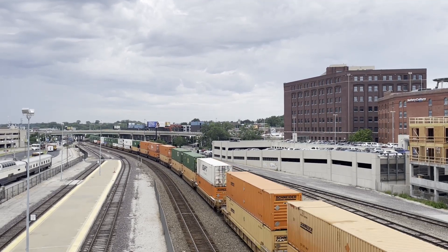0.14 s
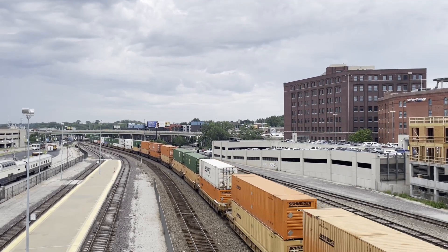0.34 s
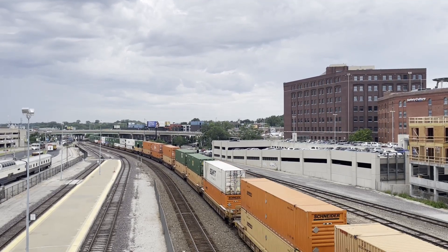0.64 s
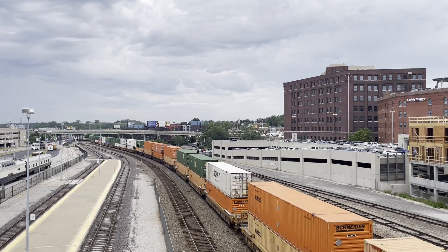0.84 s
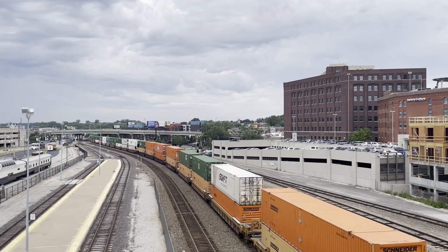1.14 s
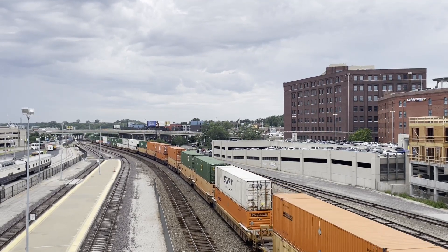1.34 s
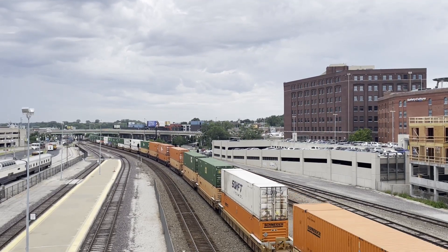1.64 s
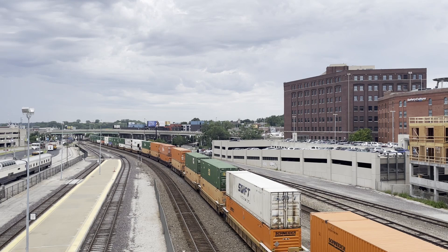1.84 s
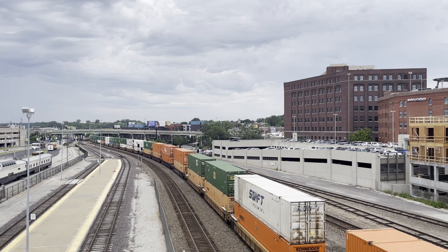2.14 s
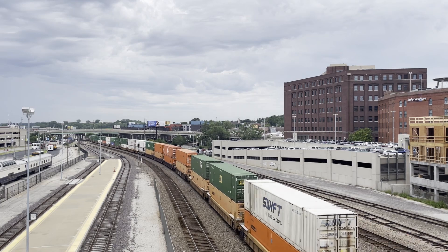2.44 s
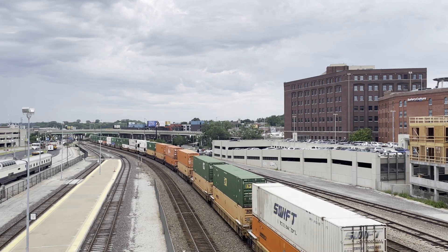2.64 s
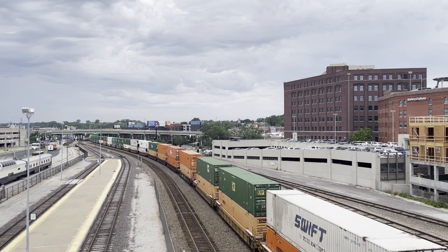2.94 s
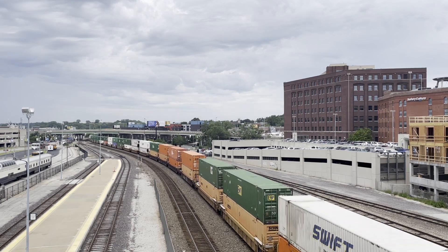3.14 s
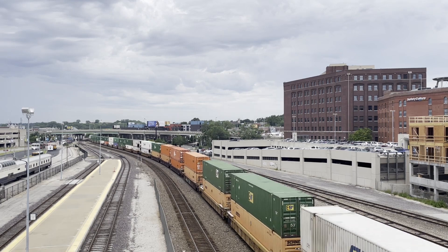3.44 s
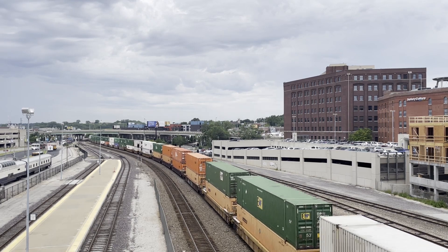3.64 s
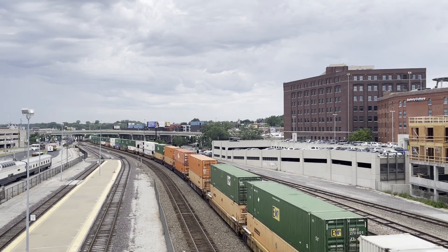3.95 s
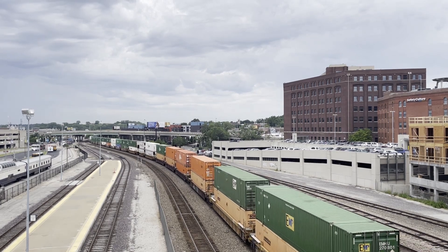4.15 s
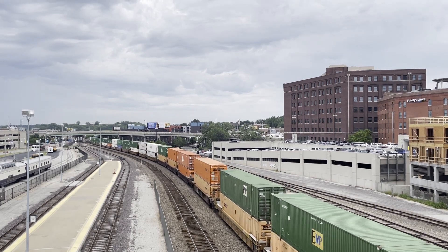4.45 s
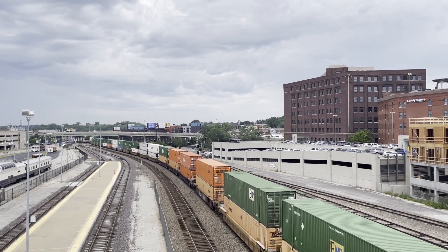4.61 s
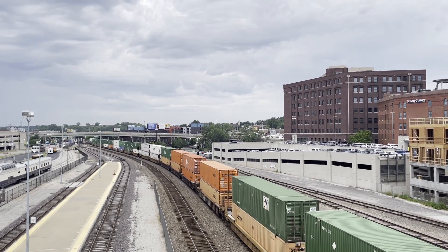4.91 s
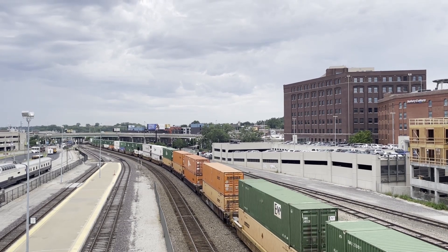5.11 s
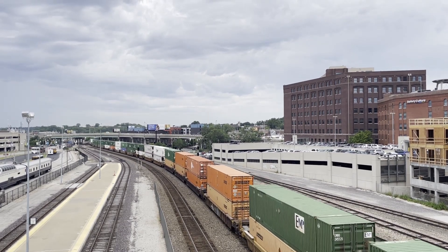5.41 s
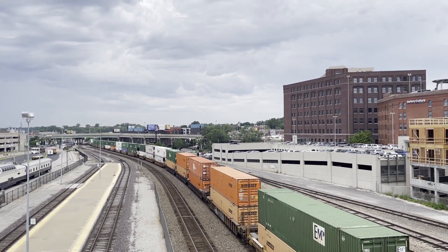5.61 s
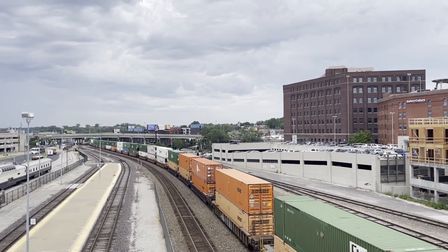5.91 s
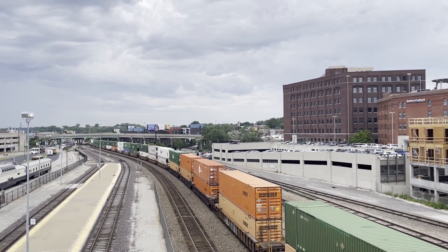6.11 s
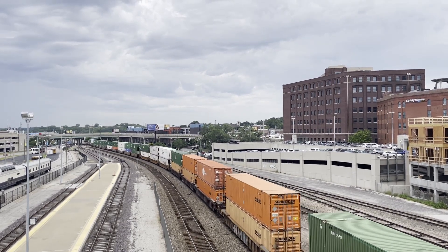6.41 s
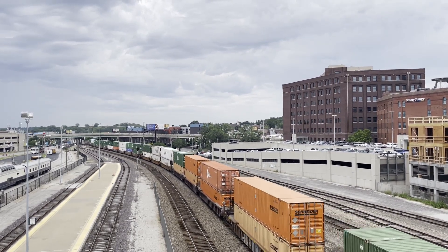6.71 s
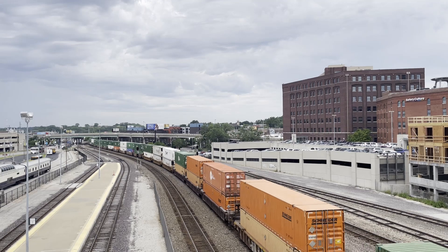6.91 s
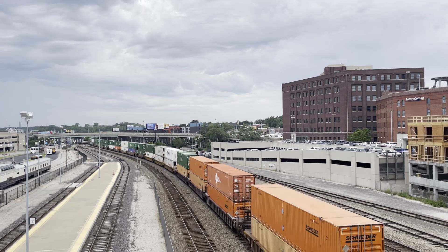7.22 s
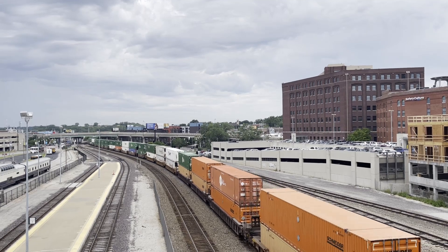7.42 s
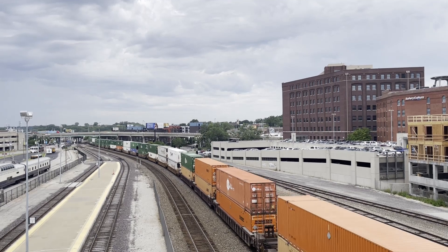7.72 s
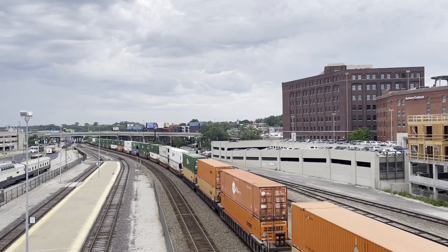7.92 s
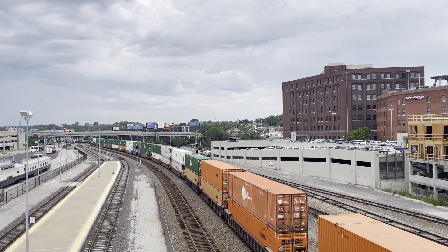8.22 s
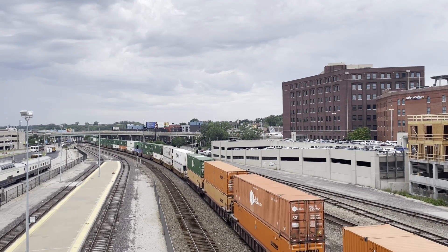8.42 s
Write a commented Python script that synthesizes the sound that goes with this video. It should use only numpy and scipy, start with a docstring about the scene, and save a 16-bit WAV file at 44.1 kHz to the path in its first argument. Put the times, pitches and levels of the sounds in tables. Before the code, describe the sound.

Steady wheel roar and low boxy rumble from passing container wagons, close and wide in stereo outdoors. Flange rubbing and faint high squeals come and go. Knocks bunch up around the middle, the deep drumming briefly drops, small chains clink, then rougher, louder rolling with dense thuds and short chirping squeals carries on to the end. Soft low wind puffs strike the phone microphone, easing midway and returning.

```python
"""Heavy wheels roar, scrape and squeal, hollow steel drums and clunks, and wind puffs at the microphone:
a double-stack container train rolls round a curve below a bridge, heard from a phone in a light wind.
Filtered noise makes the roar, drumming, rubbing and wind; gliding sine tones make most of the squeals.
Clunks are swelling tones and noise, clinks are short noise bursts, and the deep boom of empty boxes is
ringing noise. Squeals, clunks and clinks also return from the yard as a diffuse echo."""
import sys
import numpy as np
from scipy import signal
from scipy.fft import rfft, irfft
from scipy.io import wavfile
from scipy.ndimage import uniform_filter1d, map_coordinates

SR = 44100
rng = np.random.default_rng(int(sys.argv[2]) if len(sys.argv) > 2 else 0)


def dump(signal):
    """Clip the signal to [-1, 1] and save it as 16-bit WAV at the path in sys.argv[1]."""
    limited = np.clip(np.atleast_2d(signal).T, -1, 1)
    pcm = np.round(limited * 32767).astype(np.int16)
    wavfile.write(sys.argv[1], SR, pcm)


N = 377496
TIME = np.arange(N) / SR  # seconds
FREQS = np.maximum(np.arange(N // 2 + 1) * SR / N, 1)  # Hz, kept above zero for the logarithm

# How strongly the wind puffs at the phone. Each row: time in seconds, level in dB before the puffs.
WIND_STRENGTH = [(0.0, -18.5), (0.9, -22.5), (3.1, -24), (3.75, -19), (4.22, -23.5), (4.34, -27.5),
                 (5.1, -33), (5.8, -33.5), (6.4, -29), (6.75, -25.5), (7.0, -23.5), (8.56, -20)]
# Colour of the wind. Each row: frequency in Hz, relative level in dB.
WIND_COLOUR = [(12, -52), (25, -32), (40, -10.5), (58, -1), (80, -2), (110, -4.5), (145, -13), (250, -18.5),
               (600, -87)]

# Loose chains and fittings clinking. Each row: start in seconds, strength in dB before colouring.
CLINKS = [(3.122, -35), (4.539, -20), (4.786, -23), (4.883, -18), (5.241, -21), (5.913, -20), (6.113, -21),
          (6.434, -21), (6.538, -25), (7.099, -32)]
# Colour of the clinks. Each row: frequency in Hz, gain in dB.
CLINK_COLOUR = [(400, 19), (850, 15.5), (1700, 5.5), (3000, -11), (7000, -28), (14000, -55)]

# Empty containers booming. Each row: start in seconds, length in seconds, pitch in Hz, level in dB.
BOOMS = [(2.894, 0.96, 346.5, -23), (3.9, 0.45, 326, -24.5), (4.692, 0.21, 331, -26.5),
         (4.855, .42, 305, -23.5), (5.62, 0.46, 280, -25.5)]

# Rails ringing under the wheels. Each row: pitch in Hz, width of one filter pass in Hz, level in dB.
RAIL_MODES = [(1530, 150, -45), (2050, 220, -48)]
RAIL_DRIFT = 0.024  # typical share by which the ringing wanders as the wheels move along

# Treads slipping sideways on the rail head. Each row: start in seconds, length in seconds,
# centre frequency in Hz, level in dB.
SCRAPES = [(-0.1, 0.97, 1350, -34.5), (-0.1, .8, 2090, -37.5), (1.7, 0.39, 2010, -40),
           (4.87, .14, 1350, -36), (4.85, 0.77, 1740, -44), (5.4, .35, 1500, -40), (6.167, 0.14, 1040, -33),
           (7.48, 0.22, 1600, -37), (7.896, 0.079, 1410, -31.5)]

# Wheels squealing. Each row: start in seconds, length in seconds, pitch in Hz,
# level in dB before stutter and a common gain, rasp as pitch scatter in Hz, glide in Hz.
SQUEALS = [(0.448, 0.5, 3960, -51, 60, 1), (0.799, 0.6, 7090, -44.5, 9, -15),
           (0.953, 0.68, 7060, -47, 130, -78.5), (1.68, .38, 2160, -45, 45, -20),
           (1.72, .26, 1870, -44, 40, 30), (1.936, .38, 11690, -57, 50, 0), (2.05, .85, 11750, -59, 260, 0),
           (2.565, 0.11, 2095, -33, 14, 25), (2.56, 0.36, 4990, -51.5, 55, -50),
           (3.27, .16, 1965, -39.5, 35, 0), (3.7, 3.16, 3205, -56, 20, -10),
           (4.45, 0.13, 1645, -39.5, 30, 25), (4.401, 4.5, 4690, -55.5, 90, -59.5),
           (4.89, .12, 1850, -40, 50, 0), (5.02, .14, 2155, -42, 50, 0), (5.52, .16, 6570, -51, 30, 0),
           (5.776, 0.26, 6480, -46, 110, 1), (6.4, .14, 1925, -40, 45, 0), (6.86, 0.17, 1900, -38, 17, -8),
           (6.955, 0.06, 2295, -40.5, 50, 0), (6.95, .22, 3520, -44, 35, -15),
           (6.93, 0.16, 7060, -47, 90, 0), (7.3, 0.13, 1630, -37, 22, 40), (7.49, 0.11, 1370, -35, 22, 50),
           (7.53, 0.18, 1470, -35, 14, 70), (7.7, 0.26, 3200, -46, 15, 2),
           (7.82, 0.18, 3705, -45.5, 45, 20), (8.03, 0.1, 3730, -44.5, 50, 0)]
# Dry flanges sizzling and dying away. Each row: start in seconds, length in seconds, level in dB,
# release in seconds.
SIZZLES = [(2.0, 0.94, -50, 0.35), (2.85, 0.57, -49.5, 0.42), (4.8, .25, -54, 0.28), (5.6, .35, -51, .15),
           (6.95, 0.079, -41.5, 0.16)]
SIZZLE_ATTACK_S = 0.06
# Colour of the sizzle. Each row: frequency in Hz, relative level in dB.
SIZZLE_COLOUR = [(8000, -7), (10500, -7.0), (11700, -7.5), (12800, -15), (14300, -5.0)]

# Flanges pressed on the outer rail. Each row: start in seconds, length in seconds, level in dB,
# release in seconds.
FLANGE_RUBS = [(-0.1, 0.46, -33, 0.58), (1.0, 0.78, -46, 0.17), (4.3, 1.0, -40, 0.12),
               (5.745, 0.29, -36.5, 0.09), (6.25, 0.41, -39.5, 0.16), (7.05, 0.84, -35, 0.18),
               (8.2, 0.66, -39, 0.13)]
RUB_ATTACK_S, LIGHT_RUB_DB = 0.039, -45.5  # between the rubs the flanges touch lightly
# Colour of the rubbing. Each row: frequency in Hz, relative level in dB.
RUB_COLOUR = [(500, -25), (1500, 0.0), (2300, -7.4), (3300, -9.8), (4700, -9.8), (6000, -13.7),
              (7300, -14.9), (9000, -17.3), (10500, -24.9), (12500, -32.6), (15000, -37.2)]

# Slack and suspension knocks. Each row: start in seconds, strength in dB, rise in seconds,
# panel pitch in Hz, thump weight in dB, thump pitch in Hz.
CLUNKS = [(0.185, -16.5, 0.012, 449, -8, 90), (0.36, -17.5, 0.027, 363, -15, 110),
          (1.638, -5, 0.0015, 325, -5, 181), (2.972, -10.5, 0.016, 405, -15, 203),
          (3.058, -10.5, 0.0063, 335, -15, 202), (3.369, -15, 0.015, 352, -19, 123),
          (3.675, -20.5, 0.015, 285, 9.5, 113), (3.8, -24, 0.011, 300, 8, 75),
          (3.922, -15.5, 0.012, 302, 2, 101), (4.112, -18, .008, 340, -6, 130),
          (4.17, -24.5, 0.016, 307, 10.5, 119), (4.255, -12.5, 0.0074, 290, -3, 151),
          (4.918, -15, 0.007, 290, -21, 149), (5.866, -25, 0.01, 288, -20, 150),
          (6.407, -13, 0.0096, 317, -20, 202), (6.574, -8.5, 0.0068, 309, -4, 146),
          (6.65, -10, 0.011, 288, -1, 164), (6.797, -16.5, 0.011, 244, 7.5, 127),
          (6.992, -10, 0.0073, 374, -12, 120), (7.167, -9, .014, 343, -1, 92),
          (7.228, -15, 0.0084, 227, 5, 91), (7.533, -13, .012, 343, -4, 70),
          (7.786, -14.5, 0.011, 218, 8.5, 93), (7.895, -6, 0.011, 386, -22, 83),
          (8.102, -9, 0.011, 388, -11.5, 235)]
# Colour of the juddering wagon. Each row: frequency in Hz, relative level in dB.
JUDDER_COLOUR = [(40, -22), (70, -7), (130, -4), (200, 0), (300, -2), (420, -2.5), (520, -5.5), (700, -16),
                 (1100, -24), (3000, -64)]

# How hard the passing wagons drum, with a lull between two of them. Each row: time in seconds,
# level in dB before the jolts.
DRUM_STRENGTH = [(0.0, -25.5), (0.9, -23.5), (2.5, -23.5), (3.05, -19.5), (3.45, -18), (3.8, -20),
                 (4.26, -21.5), (4.36, -30), (4.66, -30), (4.76, -27), (5.1, -21), (5.5, -21), (6.0, -22.5),
                 (6.5, -19), (7.4, -19.5), (7.97, -18.5), (8.2, -20), (8.56, -20)]
# Deep rumble of the loaded frames. Each row: time in seconds, level in dB before the jolts.
RUMBLE_STRENGTH = [(0.0, -27), (3.3, -26.5), (4.22, -24), (4.34, -31.5), (4.6, -40), (5.25, -33.5),
                   (5.65, -27.5), (5.95, -30.5), (6.5, -26), (6.75, -25), (7.05, -24.5), (8.56, -24)]
# Stiff and slack wagons by turns. Each row: time in seconds,
# average level of the high panel sound against the low in dB.
BRIGHTNESS = [(0.0, -3.5), (2.9, 0), (3.4, 0), (4.0, -7.5), (4.4, 2), (4.85, -9), (5.4, -3), (8.56, -6)]
# Panels and frames of the wagons. Each row: pitch in Hz, width in Hz, relative level in dB.
WAGON_MODES = [(236, 81, -9), (291.6, 50.5, 0), (349, 37.4, 2), (404.4, 69, -1), (486, 100, -3.5),
               (588, 182, -12.5)]
# Colour laid over those panels. Each row: frequency in Hz, relative level in dB.
BOX_COLOUR = [(100, -38), (190, -12), (240, -0.5), (290, -3), (500, -3), (700, 0.5), (1100, -23),
              (2500, -42)]
# Colour of the deep rumble. Each row: frequency in Hz, relative level in dB.
RUMBLE_COLOUR = [(60, -32), (115, -4.5), (165, 6.5), (215, 2), (280, -2), (500, -54)]
JOLT_DB, JOLTS_PER_S = 1.0, 9  # uneven track shakes the wagons
PANEL_DRIFT = 0.035  # typical share by which panel pitches wander, as wagons differ

# The rolling roar, with rougher wheels in the second half. Each row: time in seconds,
# level in dB before the boost from binding flanges.
ROAR_STRENGTH = [(0.0, -29.5), (1.0, -31), (2.4, -29.5), (3.4, -29.5), (4.2, -30), (4.7, -32),
                 (4.95, -29.5), (5.6, -29.5), (6.3, -29), (7.3, -28.5), (8.56, -28.5)]
# Colour of the roar. Each row: frequency in Hz, relative level in dB.
ROAR_COLOUR = [(200, -11.5), (480, -1.5), (760, 3), (1000, -2.5), (1200, -6.5), (1550, -6.5), (2100, -10.5),
               (2700, -12.5), (3700, -19), (4800, -22.5), (6200, -24), (8200, -36), (11500, -53),
               (15000, -54)]
# Ringing wheel discs. Each row: pitch in Hz, width in Hz, relative level in dB.
WHEEL_MODES = [(3187, 49, -0.5), (4770, 200, -9), (6750, 180, -17)]
ROAR_PER_RUB = 0.084  # dB of extra rolling sound per dB of rubbing
RING_DB = -51  # ringing discs, before their swings and the boost from binding flanges

# How alike the sound is at the two microphone ports. Each row: frequency in Hz, likeness from 0 to 1.
PORT_LIKENESS = [(60, 0.75), (180, 0.52), (370, 0.81), (700, 0.54), (1400, 0.31), (2500, 0.41),
                 (4700, 0.67), (6500, 0.66), (8300, 0.93), (11500, 0.93), (13300, 0.72)]
# Lag between the ports. Each row: frequency in Hz, lead of the left port in radians.
PORT_PHASE = [(0, 0), (600, -0.7), (1380, 0.1), (1810, -1.8), (2240, 0.1), (2760, 0.6), (4130, 0.2),
              (5080, 0.7), (6800, -1.2), (7670, -2.9), (8870, -3.3), (10400, -6.1), (12300, -6.3),
              (13900, -9.1)]
# Balance of the ports. Each row: frequency in Hz, left minus right in dB.
PORT_BALANCE = [(60, 0.5), (110, 0.5), (200, 1.0), (370, 1.5), (670, 0.5), (1230, 0.5), (2240, 0.5),
                (4110, 5.5), (7510, 2.0), (13700, 0.0)]
TOP_HZ = 14330  # the phone cuts what lies above


def undb(db):
    """Turn decibels into gain."""
    return np.exp(np.asarray(db) * (np.log(10) / 20))


def unit(x):
    """Scale to an average strength (rms) of 1."""
    return x / np.sqrt(np.mean(x ** 2))


def curves(table):
    """Join the rows of a table by straight lines in time, one curve for each column after the first."""
    seconds, *columns = np.transpose(table)
    return [np.interp(TIME, seconds, column) for column in columns]


def across(points):
    """Join (Hz, value) points on a log-frequency axis."""
    hz, value = np.transpose(points)
    return np.interp(np.log(FREQS), np.log(np.maximum(hz, 1)), value)


def shape(x, response):
    """Filter a sound by a frequency response."""
    return irfft(rfft(x) * response, N)


def resonances(modes):
    """Response of several damped modes (pitches a body rings at), added with alternating signs."""
    total = 0
    for k, (hz, width, db) in enumerate(modes):
        detuning = (FREQS ** 2 - hz ** 2) / (FREQS * width)
        total = total + (-1) ** k * undb(db) / (1 + 1j * detuning)
    return total


def noise():
    """Two unrelated noises: what the ports share, and what arrives from all round."""
    return rng.standard_normal((2, N))


def walk(rate):
    """Slow random curve with spread 1 and about rate turns a second."""
    steps = uniform_filter1d(rng.standard_normal(16384), 3)
    return unit(np.interp(TIME * rate * 7, np.arange(len(steps)), steps))


def taps(rate, spread_db):
    """Random contacts, about rate a second, of uneven strength."""
    strength = undb(spread_db * np.minimum(rng.exponential(size=N), 4))
    touching = rng.random(N) < rate / SR
    return touching * strength * noise()


def wander(x, share, rate):
    """Let every pitch in a pair of sounds stray by a share, about rate turns a second."""
    passing = np.cumsum(1 + share * walk(rate))  # uneven reading position, in samples
    return np.array([map_coordinates(channel, [passing], order=1, mode="mirror") for channel in x])


def contact_gain(table, attack_s):
    """Gain of contacts that each build up, hold and let go; their powers add."""
    power = 0
    for start, length, db, release_s in table:
        age = np.maximum(TIME - start, 0)
        build_up = 1 - np.exp(-age / attack_s)
        let_go = np.exp(-np.maximum(age - length, 0) / release_s)
        power = power + (undb(db) * build_up * let_go) ** 2
    return np.sqrt(power)


def swelling_run(start, length):
    """Pick out one stretch of time and give it a gain that swells and ebbs."""
    now = (TIME > start) & (TIME < start + length)
    swell = np.sqrt(np.abs(np.sin(np.pi * (TIME[now] - start) / length)))
    return now, swell


def twice_through(resonator, x):
    """Pass a sound through one resonator twice, for a steeper peak."""
    return signal.lfilter(*resonator, signal.lfilter(*resonator, x))


def singing(lo_hz, hi_hz, width_hz, swing_db, count):
    """Four wheels each ring on modes of their own, and swell and fade by turns."""
    total = 0
    for places in rng.random((4, count)):
        rubbed = rng.standard_normal(N)
        modes_hz = lo_hz + (hi_hz - lo_hz) * (np.arange(count) + places) / count
        wheel = sum(signal.lfilter(*signal.iirpeak(hz, hz / width_hz, fs=SR), rubbed) for hz in modes_hz)
        late = np.roll(wheel, SR // 4)  # the diffuse share comes back late from the house fronts
        total = total + np.array([wheel, late]) * undb(swing_db * walk(2.5))
    return unit(total)


def yard(x, t60):
    """Diffuse echo from wagon sides and house fronts: noise fading by 60 dB in t60 seconds, at unit energy."""
    tail = rng.standard_normal((2, SR)) * np.exp(-np.log(1000) * TIME[:SR] / t60)
    tail /= np.sqrt(np.sum(tail ** 2, axis=1, keepdims=True))
    return signal.fftconvolve(x[None], tail, axes=1)[:, :N]


def buffeting():
    """Eddies break on the phone in quick uneven puffs: low noise with a restless level."""
    wind_db, = curves(WIND_STRENGTH)
    wind = unit(shape(noise(), undb(across(WIND_COLOUR))))
    return wind * undb(wind_db + 2.73 * walk(14))


def clinks(decay_s=0.0054, echo_db=-2):
    """Small steel parts knock with a short bright crack that the yard returns."""
    strength = np.zeros(N)
    for start, db in CLINKS:
        strength[int(start * SR)] = undb(db)
    fading = signal.lfilter([1], [1, -np.exp(-1 / (decay_s * SR))], strength)
    cracks = shape(noise() * fading, undb(across(CLINK_COLOUR)))
    return cracks + undb(echo_db) * yard(cracks[0], t60=1.0)


def booms(width_hz=45, diffuse_db=-3):
    """Shaking builds up in one hollow mode of a container and ebbs as the wagon moves on."""
    shaking = noise() * undb(np.array([[0], [diffuse_db]]))
    out = np.zeros((2, N))
    for start, length, hz, db in BOOMS:
        now, swell = swelling_run(start, length)
        box = signal.iirpeak(hz, hz / width_hz, fs=SR)
        hollow = twice_through(box, shaking)[:, now]
        out[:, now] += undb(db) * unit(hollow) * swell
    return out


def rails(swing_db=3.0):
    """Each rail mode rings on its own, wandering in pitch and swelling by turns."""
    total = 0
    for hz, width, db in RAIL_MODES:
        ring = shape(noise(), resonances([(hz, width, 0)]) ** 2)
        ring = wander(ring, RAIL_DRIFT, rate=3)
        total = total + undb(db) * unit(ring * undb(swing_db * walk(5)))
    return total


def scrapes(width_hz=750, chatter_db=-0.5):
    """A tread slips sideways: a short run of chattering stick-slip clicks in one broad wheel resonance."""
    slips = unit(taps(rate=1800, spread_db=0.0) * undb(chatter_db * walk(28)))
    out = np.zeros((2, N))
    for start, length, hz, db in SCRAPES:
        now, swell = swelling_run(start, length)
        wheel = signal.iirpeak(hz, hz / width_hz, fs=SR)
        rasp = twice_through(wheel, slips[:, now])
        out[:, now] += undb(db) * unit(rasp) * swell
    return out


def squeals(stutter_db=3.0):
    """Stick and slip locks a wheel on one mode: the tone stutters, rasps and glides; dry flanges sizzle."""
    tones = np.zeros(N)
    waver = walk(130)
    grip = unit(undb(stutter_db * walk(30)))
    for start, length, hz, db, rasp_hz, glide_hz in SQUEALS:
        now = slice(int(start * SR), int((start + length) * SR))
        age = (TIME[now] - start) / length  # runs from 0 to 1
        pitch = hz + glide_hz * age + rasp_hz * waver[now]
        tone = np.sin(2 * np.pi * np.cumsum(pitch) / SR)
        tones[now] += undb(db) * grip[now] * np.sin(np.pi * age) * tone
    sizzle = unit(shape(noise(), undb(across(SIZZLE_COLOUR)))) * contact_gain(SIZZLES, SIZZLE_ATTACK_S)
    return 1.31 * tones + undb(-4) * yard(tones, t60=0.25) + sizzle


def flanges(rub):
    """Flanges grind along the rail; the hiss is coloured by the high modes of the wheels."""
    hiss = noise() * undb(1.5 * walk(14))
    ringing = undb(-8.5) * singing(4300, 9500, width_hz=13, swing_db=6.0, count=11)
    return unit(shape(hiss + ringing, undb(across(RUB_COLOUR)))) * rub


def clunks(panel_db=-3, judder_db=-3.5, echo_db=-14):
    """A heavy blow, cushioned by the springs, rings one panel, makes the wagon judder and thumps the frame."""
    judder = shape(rng.standard_normal(N), undb(across(JUDDER_COLOUR)))
    struck = np.zeros(N)
    for start, db, rise_s, panel_hz, bass_db, bass_hz in CLUNKS:
        now = slice(int(start * SR), int(start * SR) + SR // 4)
        t = TIME[:len(TIME[now])]
        swell = t / rise_s * np.exp(1 - t / rise_s)  # reaches 1 after rise_s, then dies away
        panel = undb(panel_db) * np.sin(2 * np.pi * panel_hz * t)
        thump = undb(bass_db) * np.sin(2 * np.pi * bass_hz * t)
        # even out the chance loudness of the noise under each swell
        shake = judder[now] / np.sqrt(np.average(judder[now] ** 2, weights=swell ** 2))
        struck[now] += undb(db) * swell * (panel + undb(judder_db) * shake + thump)
    direct = struck * np.array([[1], [0]])  # only in the sound the ports share
    return direct + undb(echo_db) * yard(struck, t60=1.0)


def wagons(split_hz=410):
    """Rough treads shake the frames and drum on the hollow steel boxes; stiffer wagons sound brighter."""
    drum_db, = curves(DRUM_STRENGTH)
    rumble_db, = curves(RUMBLE_STRENGTH)
    bright_db, = curves(BRIGHTNESS)
    shaking = noise() + 0.22 * unit(taps(rate=500, spread_db=-1.5))
    boxes = shape(shaking, resonances(WAGON_MODES) * undb(across(BOX_COLOUR)))
    boxes = wander(boxes, PANEL_DRIFT, rate=2)
    low = shape(boxes, 1 / (1 + (FREQS / split_hz) ** 8))
    high = boxes - low
    bright = undb(bright_db + 3.0 * walk(7))
    drum = (unit(low) + bright * unit(high)) / np.hypot(1, bright)
    rumble = unit(shape(noise(), undb(across(RUMBLE_COLOUR))))
    jolts = undb(JOLT_DB * walk(JOLTS_PER_S))
    return (drum * undb(drum_db) + rumble * undb(rumble_db)) * jolts


def rolling(rub):
    """Wheel and rail roar in shifting resonances, gritty and louder when flanges bind; the wheel discs ring."""
    contact = noise() * undb(0.97 * walk(15)) + 0.22 * unit(taps(rate=200, spread_db=0.5))
    roar = unit(shape(contact, undb(across(ROAR_COLOUR))))
    roar = roar + undb(-7) * singing(511, 1050, width_hz=40, swing_db=5.0, count=3)
    ring = unit(shape(noise(), resonances(WHEEL_MODES))) * undb(RING_DB + 2.0 * walk(6.1))
    grain = undb(-13.5) * singing(1252, 2401, width_hz=25, swing_db=5.5, count=4)
    binding = (rub / undb(LIGHT_RUB_DB)) ** ROAR_PER_RUB
    roar_db, = curves(ROAR_STRENGTH)
    return (unit(roar + grain) * undb(roar_db) + ring) * binding


def ports(sound):
    """Shared and diffuse sound reach two ports on the phone's body, each with its own lag and colour."""
    shared, diffuse = rfft(sound)
    likeness = np.clip(across(PORT_LIKENESS), 0, .99)
    mid = shared * np.sqrt((1 + likeness) / 2)
    side = diffuse * np.sqrt((1 - likeness) / 2)
    lead = np.interp(FREQS, *np.transpose(PORT_PHASE))
    # each port takes half of the lead and half of the balance
    tilt = undb(across(PORT_BALANCE) / 2) * np.exp(1j * lead / 2)
    return irfft(np.array([(mid + side) * tilt, (mid - side) / tilt]), N)


def scene():
    """The train and the wind at the two ports; one rubbing curve drives both flanges and roar."""
    rub = np.hypot(undb(LIGHT_RUB_DB), contact_gain(FLANGE_RUBS, RUB_ATTACK_S))
    train = wagons() + booms() + rolling(rub) + rails() + flanges(rub) + scrapes() + squeals() + clunks() + clinks()
    return ports(train + buffeting())


def record(dry):
    """The phone sheds the deepest bass, rounds the highest peaks and cuts the top."""
    lean = signal.sosfilt(signal.butter(2, 25, "high", fs=SR, output="sos"), dry)
    rounded = lean / (1 + (lean / .95) ** 6) ** (1 / 6)
    return signal.sosfilt(signal.ellip(8, .2, 70, TOP_HZ, fs=SR, output="sos"), rounded)


dry = scene()
out = record(dry)
dump(out)
```